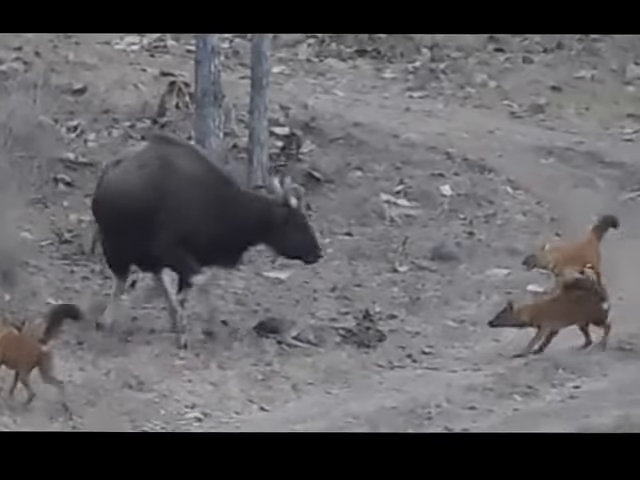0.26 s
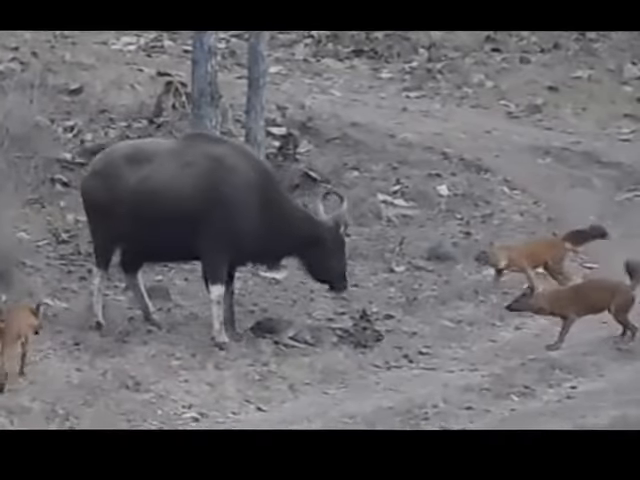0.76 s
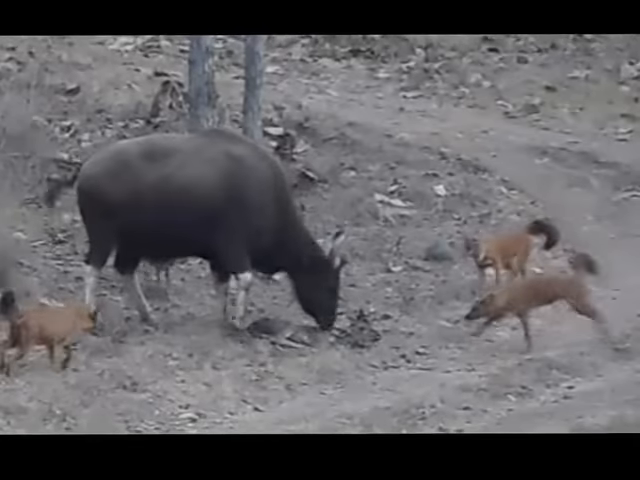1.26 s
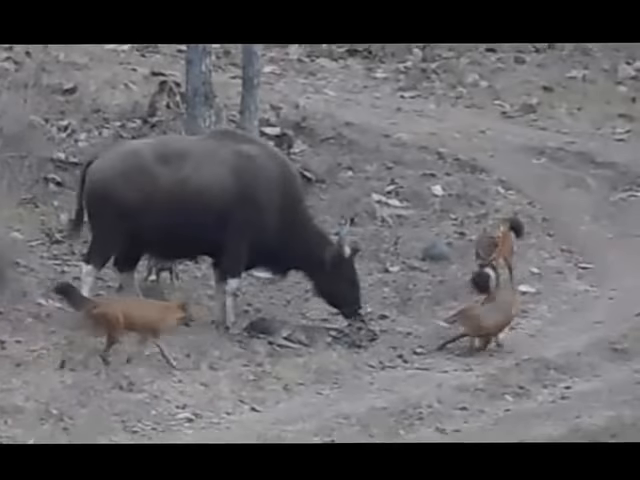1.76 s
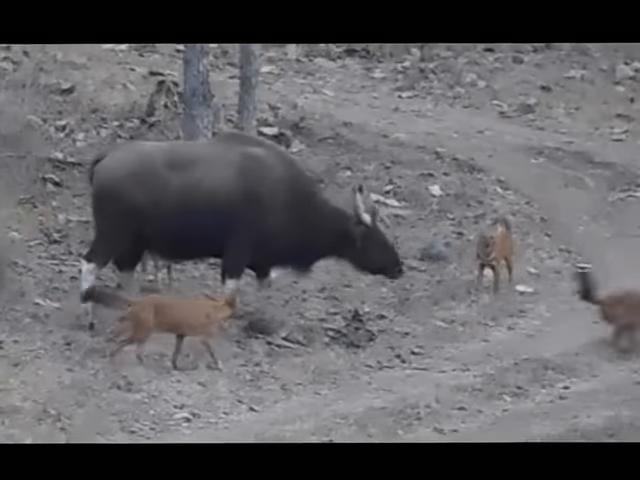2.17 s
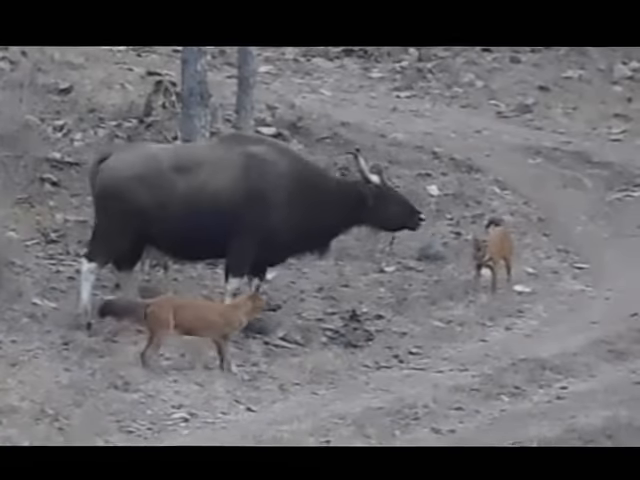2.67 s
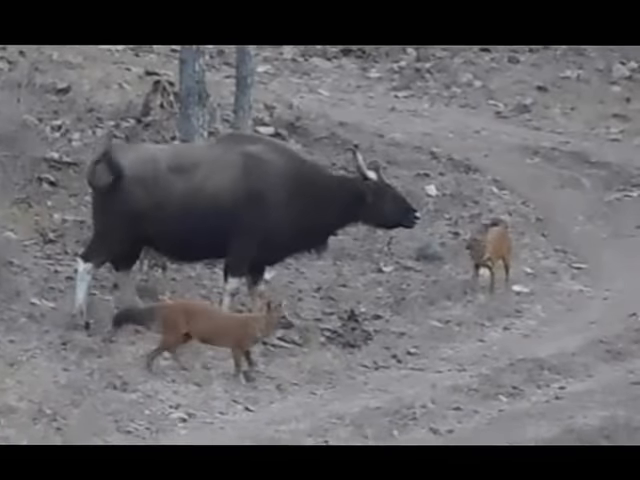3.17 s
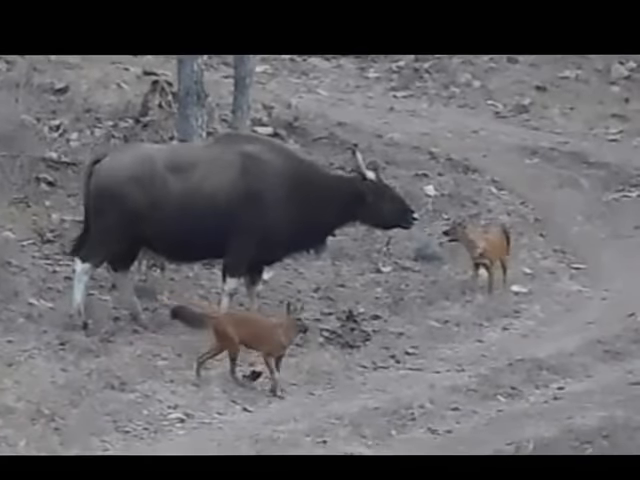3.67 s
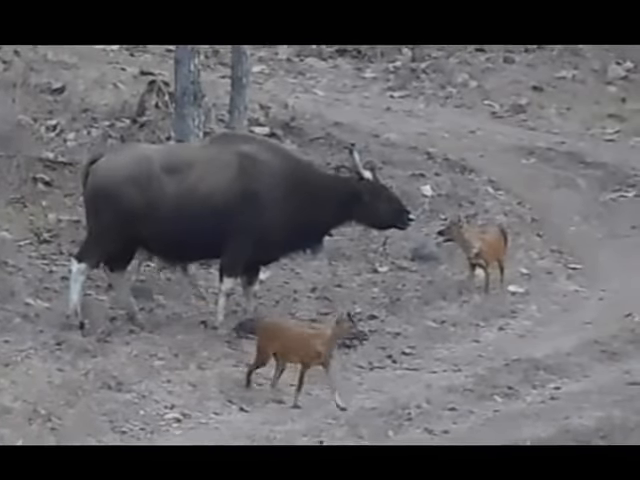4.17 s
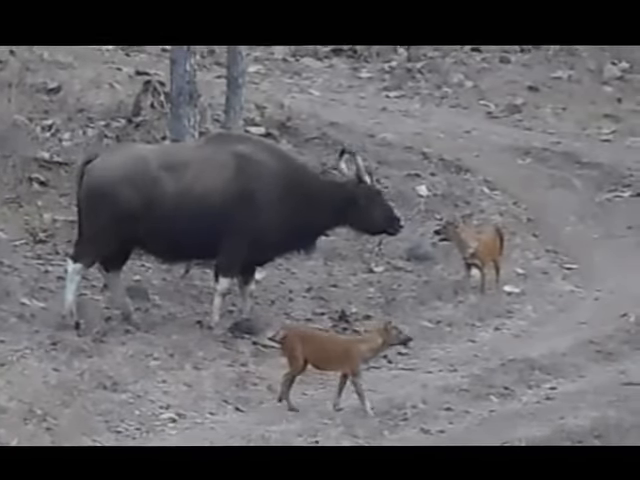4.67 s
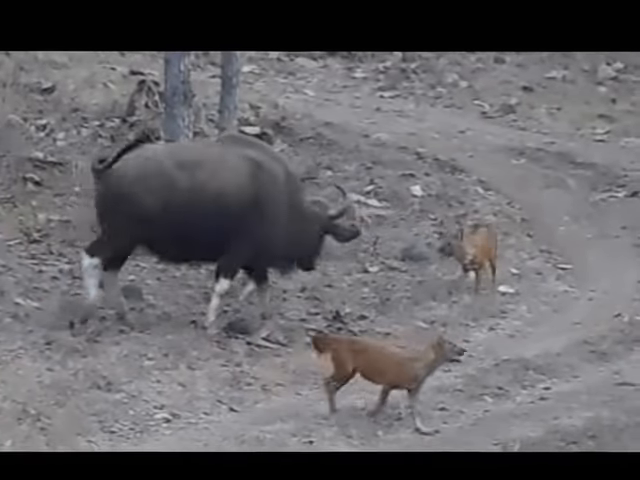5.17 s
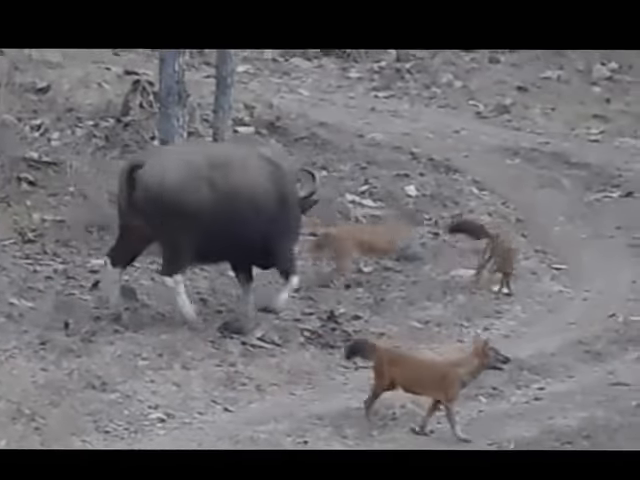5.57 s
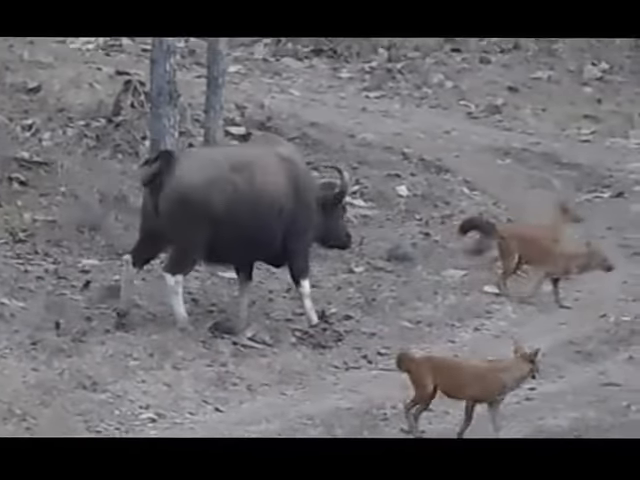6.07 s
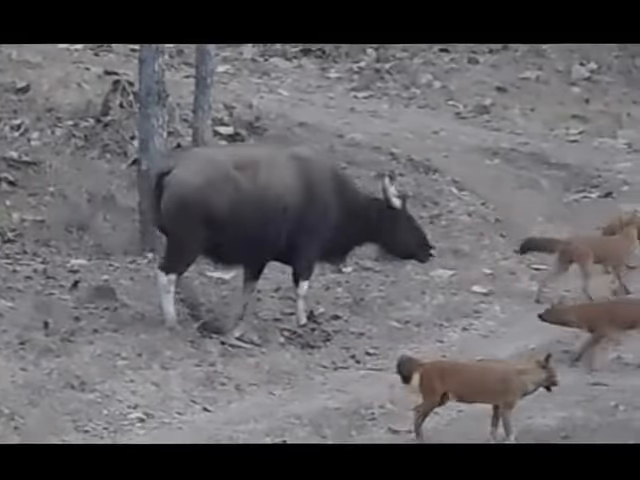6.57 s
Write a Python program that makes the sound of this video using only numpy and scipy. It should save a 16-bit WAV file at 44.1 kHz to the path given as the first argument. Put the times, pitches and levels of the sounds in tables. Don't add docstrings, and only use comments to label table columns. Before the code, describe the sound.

Wild dogs give six short, high honking yelps in an open forest, echoing off trunks, over airy hiss, faint birds and light steps on dry leaves.

```python
import sys
import numpy as np
from scipy import signal
from scipy.fft import rfft, irfft
from scipy.io import wavfile

SR = 44100
rng = np.random.default_rng(int(sys.argv[2]) if len(sys.argv) > 2 else 0)


def invert_db(x):
    u = np.asarray(x, float) / 20
    return 10 ** u


def master_out(mix):
    frames = np.transpose(np.atleast_2d(mix))
    ceiling = np.clip(frames, -1, 1)
    pcm = np.round(ceiling * 32767).astype(np.int16)
    wavfile.write(sys.argv[1], SR, pcm)


N = 300352

# start in seconds, register break in seconds, pitch in Hz,
# level in dB, level of the period-tripling rattle in dB.
YELPS = [
    (1.6, 1.662, 612.4, -39.5, -47),
    (2.114, 2.179, 615, -35, -39.5),
    (2.57, 2.637, 606.5, -32.5, -38.5),
    (5.359, 5.436, 621.3, -36, -44),
    (5.854, 5.92, 605.4, -33, -39.5),
    (6.393, 6.460, 604.6, -32, -40.5),
]


def at_hz(points, hz):
    points_hz, points_db = np.transpose(points)
    return np.interp(np.log(np.maximum(hz, 1)), np.log(points_hz), points_db)


def drift(count, rate_hz):
    settle = 20000
    r = np.exp(-2 * np.pi * rate_hz / SR)
    slow = signal.lfilter([1], [1, -2 * r, r * r], rng.standard_normal(count + settle))[settle:]
    return slow * np.sqrt((1 - r * r) ** 3 / (1 + r * r))


def add(out, start_s, piece):
    i = round(start_s * SR)
    out[i:i + len(piece)] += piece[:N - i]


def sine(hz):
    return np.sin(2 * np.pi * np.cumsum(hz) / SR)


def unroll(note, fade_s):
    s, *columns = np.transpose(note)
    t = np.arange(s[0], s[-1], 1 / SR)
    edge = np.clip(np.minimum(t - s[0], s[-1] - t) / fade_s, 0, 1)
    window = np.sqrt(2) * np.sin(edge * np.pi / 2) ** 2
    return [window] + [np.interp(t, s, c) for c in columns]


def swell(t, peak_s, peak_db, rise_db, fall_db, roundness):
    before = np.clip(1 - t / peak_s, 0, 1)
    after = np.clip((t - peak_s) / (t[-1] - peak_s), 0, 1)
    return peak_db - rise_db * before ** roundness - fall_db * after ** roundness


def registers():
    # length in seconds, start pitch in Hz, glide in Hz, level in dB,
    # 2nd harmonic in dB.
    breaks = [
        (.08, 547, 30, -30, -50),
        (.064, 552, 24, -26, -49),
        (.082, 544, 13, -25.5, -43),
        (.048, 598, 18, -28, -34.5),
        (.066, 555, -8, -27, -42),
        (.066, 543, 2.5, -27.5, -43),
    ]
    # peak after seconds, level at peak in dB, rise in dB, fall in dB, roundness.
    high_swell = [
        (0.0295, 1, 42, 11, 1.02),
        (0.04, -2, 23, 7.5, 1.66),
        (0.045, -21, 19.5, -2, 1.6),
        (0.059, -0.5, 23, 10.5, 1.33),
    ]
    # peak after seconds, level at peak in dB, rise in dB, fall in dB, roundness.
    low_swell = [
        (.027, 0, 14, 13, 4.0),
        (.03, 0, 8, 16, 2.5),
        (.03, -26.5, -1.5, 8, 2.2),
        (.006, -3, 1.5, 15, .7),
    ]
    overlap_s, effort_hz, effort_width_s = 0.013, 21.93, 0.01545
    effort_peak_s = high_swell[0][0]
    share = np.arange(13) / 12
    high, low = [], []
    for yelp, after_break in zip(YELPS, breaks):
        s, break_s, hz, db, rattle_db = yelp
        length_s, low_hz, glide_hz, low_db, second_db = after_break

        t = share * (break_s + overlap_s - s)
        pitch = hz + effort_hz * np.exp(-((t - effort_peak_s) / effort_width_s) ** 2)
        levels = [level + swell(t, *rule) for level, rule in zip((db, db, db, rattle_db), high_swell)]
        high.append(np.transpose([s + t, pitch] + levels))

        t = share * length_s
        pitch = low_hz + glide_hz * (1 - (1 - share) ** 2)
        start_levels = (low_db, second_db, low_db, rattle_db)
        levels = [level + swell(t, *rule) for level, rule in zip(start_levels, low_swell)]
        low.append(np.transpose([break_s + t, pitch] + levels))
    return high, low


def yelps(notes, jitter, shimmer_db, upper_db):
    # harmonic number, level under the third in dB.
    upper = [(4, -25), (5, -37), (6, -43), (7, -47), (8, -47), (9, -40)]
    # frequency in Hz, level in dB.
    throat = [(400, -28), (800, -22), (1030, -12), (1250, -4), (1450, 0), (1680, -1), (2000, -14),
              (2300, -21), (3000, -31), (5000, -34)]
    throat_band = signal.butter(3, [1120, 1950], "band", fs=SR, output="sos")
    out = np.zeros(N)
    for note in notes:
        edge, hz, third, second, first, rattle = unroll(note, fade_s=.005)
        count = len(hz)
        turn = 2 * np.pi * np.cumsum(hz * (1 + jitter * drift(count, 90))) / SR
        levels = [(1, first + 1.0), (2, second), (3, third)]
        levels += [(k, third + db + upper_db) for k, db in upper]
        voice = 0
        for k, db in levels:
            unsteady_db = shimmer_db * k / 3 * drift(count, 70)
            voice = voice + invert_db(db + unsteady_db) * np.sin(round(k) * turn + rng.uniform(0, 7.15))
        for k in range(2, 30):
            if k % 3:
                line_db = rattle + 4.5 + at_hz(throat, hz * k / 3) + 2.5 * drift(count, 40)
                phase = k * turn / 3 + rng.uniform(0, 7) + 1.1 * drift(count, 60)
                voice = voice + invert_db(line_db) * np.sin(phase)
        rasp = signal.sosfilt(throat_band, rng.standard_normal(count))
        voice = voice + invert_db(np.maximum(rattle, third - 22) + 10) * rasp
        add(out, note[0][0], edge * voice)
    return out


def forest(x):
    # delay in seconds, level in dB.
    trunks = [(.02, -47), (0.061, -51), (.1, -56.5), (0.158, -55), (.26, -59), (.4, -68.5), (0.698, -82),
              (1.3, -95)]
    s, db = np.transpose(trunks)
    t = np.arange(round(1.3 * SR)) / SR
    out = 0
    for group in range(5):
        echoes = rng.standard_normal(len(t)) * invert_db(np.interp(t, s, db) - 1.5) * (t > s[0])
        waver_samples = 5.5 * drift(N, 45)
        tail = signal.fftconvolve(x, echoes)[:N]
        out = out + np.interp(np.arange(N) + waver_samples, np.arange(N), tail)
    return out


def falling_notes():
    # start in seconds, length in seconds, top after seconds, top pitch in Hz, fall in Hz per s.
    falls = [
        (2.768, .06, .027, 6780, 26300),
        (2.938, .103, .044, 6510, 22740),
        (3.151, 0.102, .015, 5470, 28500),
        (3.376, 0.099, -0.016, 5530, 20000),
    ]
    level_db, arch_s = -65.5, 0.023
    out = np.zeros(N)
    for s, length_s, top_s, top_hz, fall in falls:
        edge, t = unroll([(s, -top_s), (s + length_s, length_s - top_s)], fade_s=0.012)
        hz = top_hz - fall * (np.hypot(t, arch_s) - arch_s)
        add(out, s, edge * invert_db(level_db + 3.5 * drift(len(hz), 60)) * sine(hz))
    return out


def chips_and_hoots():
    # start in seconds, length in seconds, start pitch in Hz, end pitch in Hz, level in dB.
    chips = [(.89, .025, 9300, 9000, -84.5), (1.01, .025, 9400, 8950, -81), (1.09, 0.013, 10000, 8950, -85),
             (1.118, 0.061, 8650, 8640, -79.5), (1.175, 0.021, 10000, 8400, -82),
             (1.2, .025, 6700, 7400, -75.5), (1.3, 0.021, 6400, 6500, -75.5), (1.34, .02, 8300, 8440, -79),
             (2.396, 0.015, 2360, 2310, -46), (3.07, .02, 6200, 5970, -73.5),
             (4.205, 0.031, 6250, 6230, -70), (4.238, 0.0066, 5400, 5600, -65),
             (4.27, 0.019, 6700, 7330, -75.5), (5.08, .02, 8350, 8150, -83)]
    # start in seconds, length in seconds, start pitch in Hz, end pitch in Hz, level in dB.
    hoots = [
        (0.862, 0.045, 553, 614, -72),
        (1.065, 0.037, 487, 522, -67.5),
        (1.218, 0.041, 555, 624, -69.5),
        (1.358, 0.058, 696, 687, -68.5),
        (1.445, 0.075, 652, 613, -65.5),
        (1.52, 0.048, 532, 490, -73.5),
        (1.84, 0.15, 463.7, 543, -65),
        (1.94, 0.25, 526.6, 559, -63),
    ]
    out = np.zeros(N)
    for s, length_s, start_hz, end_hz, db in chips + hoots:
        edge, hz = unroll([(s, start_hz), (s + length_s, end_hz)], fade_s=0.18 * length_s)
        add(out, s, edge * invert_db(db) * sine(hz))
    return out


def trills():
    # start in seconds, length in seconds, centre in Hz, level in dB.
    wheezes = [(1.376, .06, 6980, -75.5), (1.447, 0.096, 6930, -75), (5.557, 0.087, 9160, -82),
               (1.658, .06, 7260, -72), (1.909, 0.036, 6710, -62.5), (2.581, 0.13, 6960, -69),
               (6.19, 0.069, 7400, -67), (6.385, 0.075, 7120, -71), (6.454, 0.077, 7210, -67.5),
               (6.694, 0.066, 7400, -70.5)]
    out = np.zeros(N)
    for s, length_s, centre_hz, db in wheezes:
        edge, hz = unroll([(s, centre_hz), (s + length_s, centre_hz)], fade_s=0.25 * length_s)
        hz = hz + 200 * drift(len(hz), 150)
        add(out, s, edge * invert_db(db + 2.4 * drift(len(hz), 80)) * sine(hz))
    return out


def puffs(steps, die_s):
    out, t = np.zeros(N), np.arange(1800) / SR
    for s, db, low_hz, high_hz in steps:
        band = signal.butter(2, [low_hz, high_hz], "band", fs=SR, output="sos")
        puff = signal.sosfilt(band, rng.standard_normal(len(t)) * t * np.exp(-t / die_s))
        add(out, s - die_s, invert_db(db + 9) * puff / np.abs(puff).max())
    return out


def footfalls():
    # time in seconds, level in dB, lowest Hz, highest Hz.
    leaf_ticks = [(.385, -63.5, 3000, 8350), (.42, -60.5, 2000, 8450), (.93, -63.5, 1500, 4440),
                  (1.013, -64, 1500, 3000), (1.1, -62, 1480, 2980), (1.5, -63, 1500, 2620),
                  (1.96, -57, 2820, 7920), (2.0, -58, 3380, 7320), (2.05, -55, 2060, 3600),
                  (2.097, -54.5, 2340, 3400), (2.33, -54.5, 2500, 5090), (3.98, -80, 7030, 9500),
                  (4.054, -82, 2010, 3200), (4.176, -62, 2000, 5570), (4.615, -70.5, 6000, 10000),
                  (4.649, -64, 2000, 3970), (4.751, -79, 1960, 8000), (5.194, -73.5, 2500, 5460),
                  (5.25, -61.5, 2000, 8400), (5.321, -65, 2500, 7000), (5.344, -59.5, 3460, 4930),
                  (5.372, -65.5, 2430, 9450), (5.42, -60.5, 2460, 4900), (5.5, -67.5, 7000, 9500),
                  (5.741, -52.5, 2760, 4520), (5.775, -74, 7350, 9400), (5.953, -55, 2530, 9940),
                  (6.658, -70, 3900, 8660)]
    # time in seconds, level in dB, lowest Hz, highest Hz.
    thumps = [
        (.19, -61, 300, 933),
        (2.883, -58, 200, 493),
        (3.371, -52.5, 246, 980),
        (3.476, -62, 402, 647),
        (5.741, -50, 206, 1100),
    ]
    steps = puffs(leaf_ticks, die_s=.003) + puffs(thumps, die_s=.002)
    return signal.sosfilt(signal.butter(8, 9000, fs=SR, output="sos"), steps)


def lift():
    lift_db, from_s, top_s, sink_s = 12.5, -0.17, 0.14, 0.69
    earlier_break_s = -0.28
    breaks_s = np.array([earlier_break_s] + [row[1] for row in YELPS])
    since = np.arange(N) / SR - breaks_s[:, None]
    climb = np.clip((since - from_s) / (top_s - from_s), 0, 1)
    sink = np.exp(-np.maximum(since - top_s, 0) / sink_s)
    return lift_db * np.max(climb * sink, axis=0)


def rustle():
    # centre in seconds, half length in seconds, level in dB.
    stirs = [
        (0.44, 0.086, 2),
        (.74, 0.032, 1),
        (1.452, .06, 0.5),
        (1.952, 0.049, 1.5),
        (2.448, .06, 2.5),
        (4.294, 0.071, 0),
        (5.291, 0.074, 4),
    ]
    t = np.arange(N) / SR
    return sum(db * np.exp(-((t - s) / half_s) ** 2) for s, half_s, db in stirs)


def coloured(spectrum, low_hz, high_hz, patchy_db):
    hz = np.fft.rfftfreq(N, 1 / SR)
    inside = (hz > spectrum[0][0]) & (hz < spectrum[-1][0])
    shaped = rfft(rng.standard_normal(N)) * invert_db(at_hz(spectrum, hz)) * inside
    power = np.sum(np.abs(shaped[(hz > low_hz) & (hz < high_hz)]) ** 2)
    shaped = shaped * N / np.sqrt(2 * power)
    octave = np.floor(np.log2(hz / 20 + 1))
    together = drift(N, 6)
    out = 0
    for k in np.unique(octave[np.abs(shaped) > 0]):
        flicker_db = patchy_db * (0.61 * together + 0.68 * drift(N, 32))
        out = out + irfft(shaped * (octave == k), N) * invert_db(flicker_db)
    return out


def forest_air():
    # frequency in Hz, level in dB per Hz.
    hiss = [(300, -20.5), (450, -3.5), (650, -1), (1300, -2.5), (1800, -3.5), (3500, -8), (5500, -15),
            (7000, -18), (8500, -24.5), (9700, -31.5), (10300, -47.5), (11000, -59.5)]
    # frequency in Hz, level in dB per Hz.
    rumble = [(12, -44.5), (20, -18), (91, -10), (161, -6.5), (195, -7), (271, -4), (450, -5.5),
              (580, -51.5), (990, -120)]
    gain_db = lift()
    hiss_db = -70 + gain_db + rustle()
    rumble_db = -75.5 + 1.025 * gain_db
    air = invert_db(hiss_db) * coloured(hiss, 2393, 6500, patchy_db=1.34)
    return air + invert_db(rumble_db) * coloured(rumble, 92, 450, patchy_db=-2.3)


def scene():
    high_notes, low_notes = registers()
    dogs = yelps(high_notes, jitter=.008, shimmer_db=2.4, upper_db=-3)
    dogs = dogs + yelps(low_notes, jitter=.0025, shimmer_db=1.4, upper_db=0)
    birds = falling_notes() + chips_and_hoots() + trills()
    echoes = forest(dogs + invert_db(3) * birds)
    return (dogs + birds + echoes + footfalls() + forest_air())[None]


def low_pass(x):
    return signal.sosfilt(signal.butter(12, 15500, fs=SR, output="sos"), x)


def record(dry):
    # frequency in Hz, level in dB.
    leak = [(11000, -17.5), (13000, -6), (14500, -9), (15500, -9.5)]
    cutoff_hz = 15560
    hz = np.fft.rfftfreq(N, 1 / SR)
    mirrored = rfft(dry * (-1.) ** np.arange(N))
    image = mirrored * invert_db(at_hz(leak, hz)) * (hz < cutoff_hz)
    return low_pass(dry + irfft(image, N))


dry = scene()
out = record(dry)
master_out(out)
```